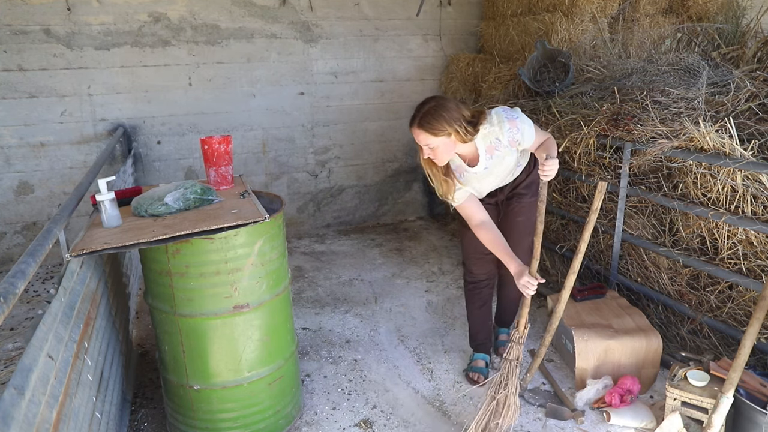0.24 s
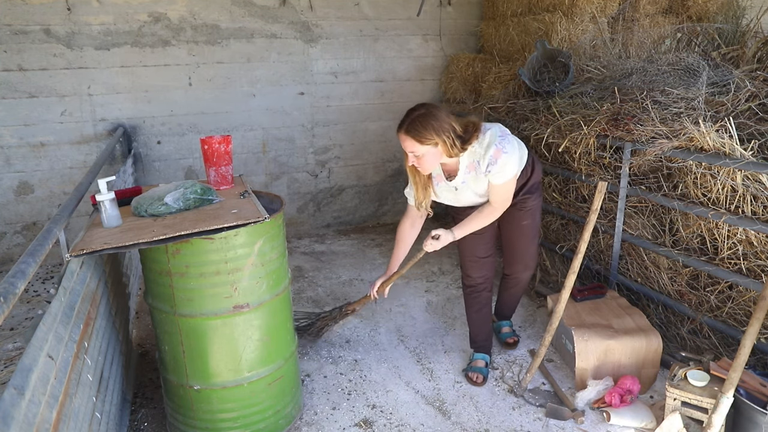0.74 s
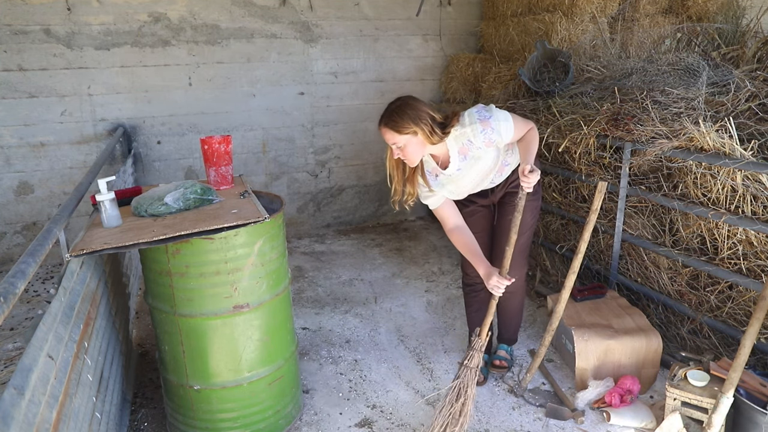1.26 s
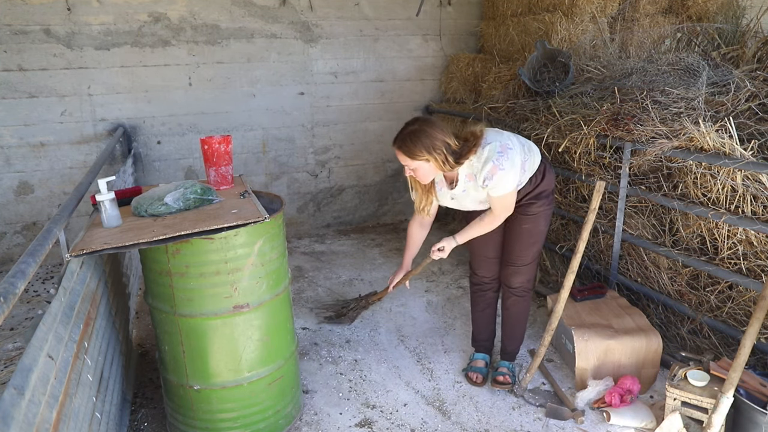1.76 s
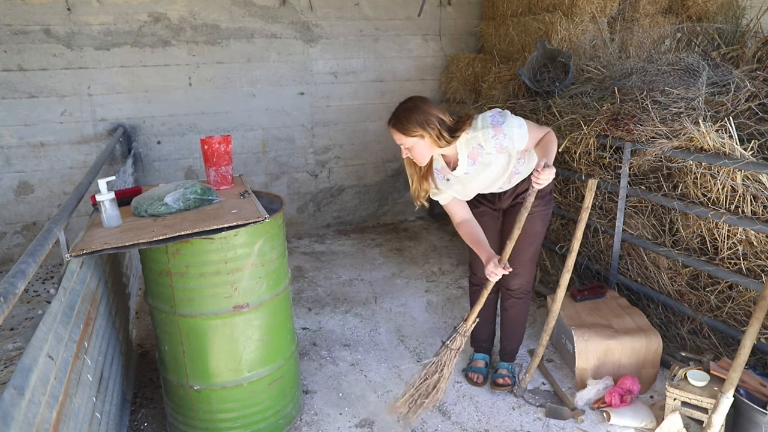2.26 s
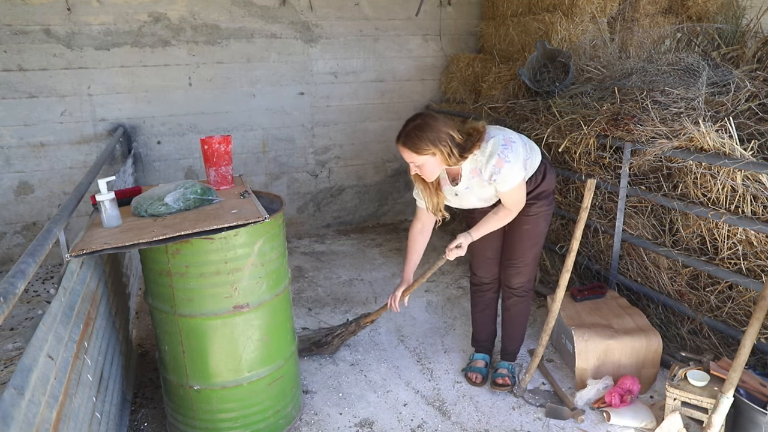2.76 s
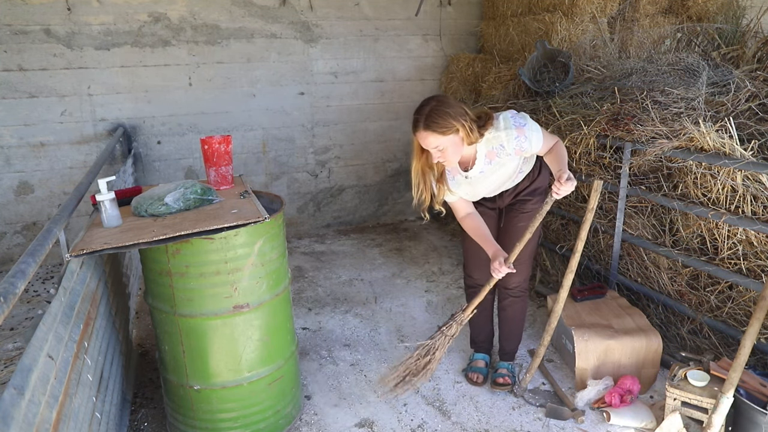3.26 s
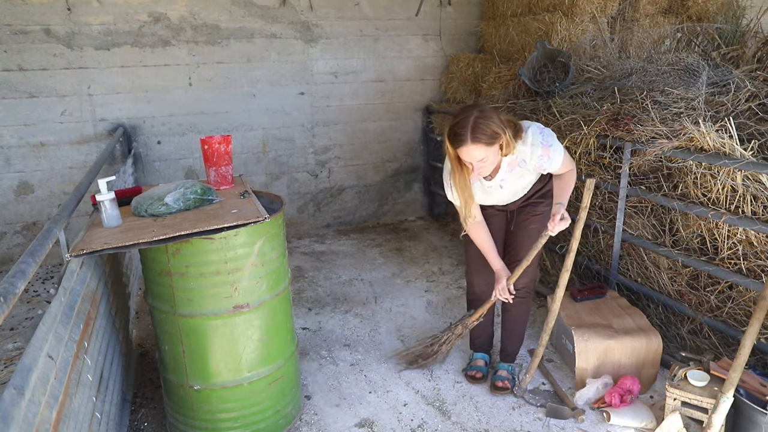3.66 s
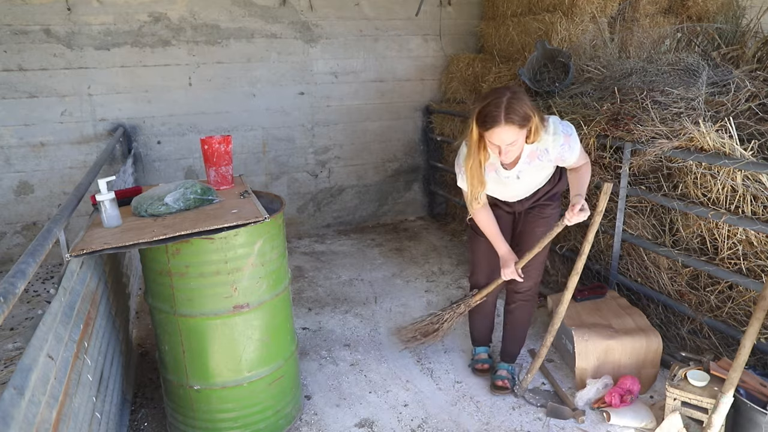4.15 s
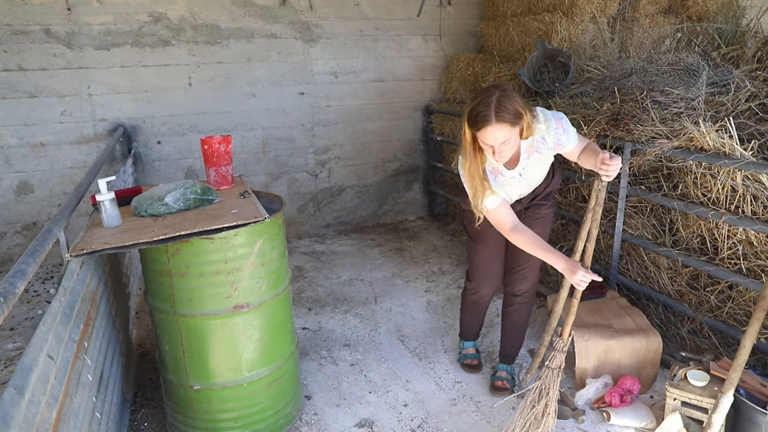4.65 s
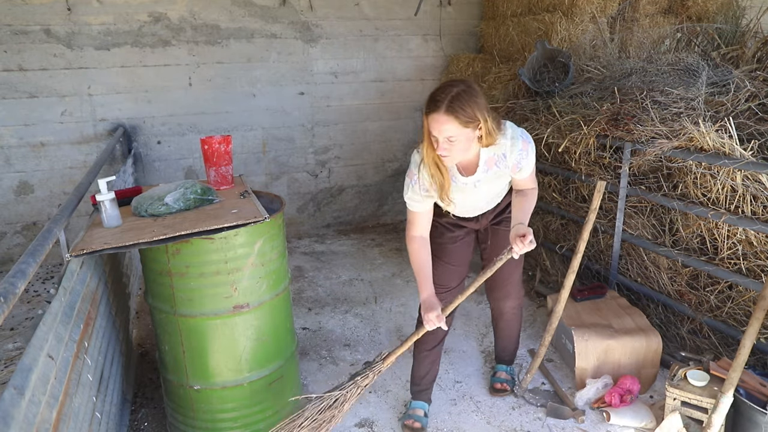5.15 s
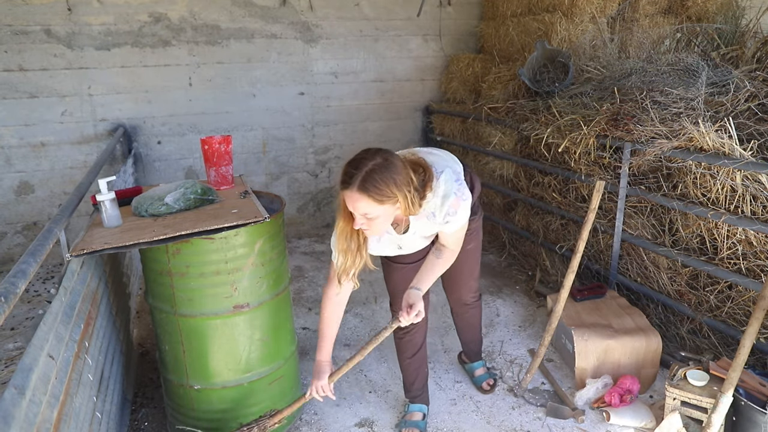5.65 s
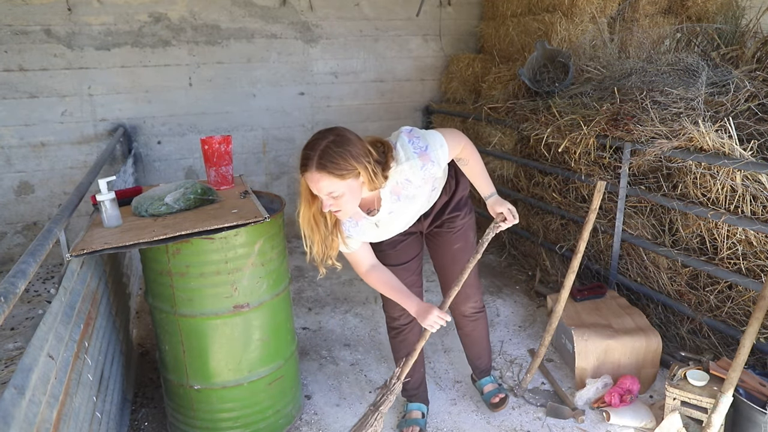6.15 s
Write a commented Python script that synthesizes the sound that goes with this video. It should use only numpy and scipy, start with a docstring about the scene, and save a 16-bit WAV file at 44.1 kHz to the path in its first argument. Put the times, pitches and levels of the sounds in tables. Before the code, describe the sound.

A straw broom works over a concrete floor in a quiet stable, heard by one microphone with short reflections from bare walls. A crisp, hissing stroke fills 0-0.4 s with a tick and tiny squeal; after a gap, double strokes come around 0.9-1.4, 1.9-2.3 and 2.8-3.2 s, each rasp climbing in pitch, with sharp twig snaps, the brightest near 2.9. A sheet-metal partition hums barely audibly around 3. Ticks cluster at 3.6 as another stroke runs to 4.0, then a brisk pair from 4.4 to 4.8 with brief squeaks. Low wind thuds and flutters throughout, dropping away by 4.6. Near 5.25 a sandal knocks and drags. At 5.6-5.7 the twigs strike and rake a steel drum, a loud hollow clatter with short ringing. A last swishing stroke follows around 5.8-6.1, then near-quiet, a faint squeak and a soft footfall at 6.3.

```python
"""A straw broom sweeps a concrete stable floor in brisk strokes: shaped noise and tiny slips, swelling rub by rub.
Its twigs tick in short snaps, squeal briefly, and once knock and rake a steel drum, whose modes ring.
A sheet-metal partition hums when brushed, and sandals knock and drag on the floor as struck modes and noise.
Wind buffets the single microphone in low noise over quiet stable air.
The bare walls, the nearest a metre off, answer briefly with decaying noise."""
import sys
import numpy as np
from scipy import signal
from scipy.fft import rfft, irfft, next_fast_len
from scipy.io import wavfile
from scipy.ndimage import uniform_filter1d, map_coordinates

SR = 44100
rng = np.random.default_rng(int(sys.argv[2]) if len(sys.argv) > 2 else 0)


def log_audio(samples):
    """Write samples as a 16-bit WAV file to the path given in sys.argv[1]."""
    # one column per channel
    frames = np.atleast_2d(samples).T
    # limit to full scale, then quantise
    limited = np.clip(frames, -1, 1)
    pcm = np.round(limited * 32767).astype(np.int16)
    wavfile.write(sys.argv[1], SR, pcm)


def field_ratio(decibels):
    """Amplitude ratio for a level in dB (20 dB per decade); scalars and array-likes work."""
    return 10 ** (np.asarray(decibels, dtype=float) / 20)


N = 282222  # length in samples

STRAY_PER_S, STRAY_DB = 60, -15  # loose straws that crack one at a time: rate, level relative to the hiss
# Fine bristle tips on the concrete. Each row: frequency in Hz, relative density in dB per Hz.
HISS = [(1470, -26), (2500, -8.5), (3240, -24), (3450, -7.5), (5460, 1.5), (6560, -1.5), (8130, 2),
        (9850, -3.5), (14000, -5), (15600, -7)]
# Thick twigs on the concrete. Each row: frequency in Hz, relative density in dB per Hz.
SCRAPE = [(180, -55), (300, -21), (453, -10.5), (498, -14.5), (806, -6.5), (1020, -5), (1470, 0),
          (1600, -0.5), (5000, -5.5), (6500, -51), (11000, -120)]
# Pitch at which the bent twigs rasp; it climbs through most pulls. Each row: time in seconds, pitch in Hz.
RASP = [(0.03, 2660), (.17, 3500), (.39, 3860), (.6, 1800), (.86, 2650), (.97, 2600), (1.17, 3270),
        (1.3, 2950), (1.55, 1800), (2.03, 2320), (2.13, 3180), (2.32, 3700), (2.55, 1800), (2.8, 1950),
        (2.96, 3250), (3.24, 3050), (3.45, 1600), (3.69, 1690), (3.82, 3400), (4.08, 3000), (4.25, 1680),
        (4.42, 2600), (4.51, 3420), (4.72, 3300), (5.0, 1900), (5.67, 1580), (5.9, 2050), (6.07, 3580),
        (6.21, 1450)]


def broom():
    """Fine tips hiss, thick twigs scrape lower; both judder over the rough floor."""
    hiss_gain, scrape_gain = rubbing()
    rasp_hz, = curves(RASP)
    judder_db = 0.68 * wobble(45) + 0.83 * wobble(160)
    tips = coloured(patchy(slips(2500, 3.6, smooth=0.86), depth_db=0.57), HISS)
    twigs = coloured(patchy(slips(1200, 2.1, smooth=0.63), depth_db=1.03), SCRAPE)
    twigs = unit(rasping(twigs, rasp_hz, lift_db=6, octaves=.35))
    strays = coloured(slips(STRAY_PER_S, 2.4, smooth=0), HISS)
    tips = tips + field_ratio(STRAY_DB) * strays
    tip_flicker = field_ratio(0.9 * wobble(45))
    return field_ratio(judder_db) * (hiss_gain * tip_flicker * tips + scrape_gain * twigs)


LIFT_DB_PER_S = 214  # fade as the rubbing lifts off
SAG_DB_PER_S = 13.5  # a rub slackens while it is held
GRIT_DB, GRIT_DB_PER_S = -32.5, 21  # grit rolls on after a rub: level relative to it, fade
# Rubbing on the floor: the broom landing, pulled or lightly brushing, and near 5.2 s a shifting foot.
# Each row: start in seconds, rise in seconds, hold in seconds, hiss level in dB,
# low scrape relative to the hiss in dB.
RUBS = [(0.0, 0.039, .135, -36, -5), (0.15, .104, 0.061, -32.5, -6), (.433, .012, .087, -59.5, -7.5),
        (.85, .035, .084, -44.5, -4.5), (.948, .078, 0.28, -34.5, -3.5), (1.065, 0.096, .14, -36.5, -5.5),
        (1.65, 0.048, .002, -65.5, 4.5), (1.83, 0.047, .104, -57.5, -2.5), (1.881, 0.2, 0.18, -34.5, -4.5),
        (2.085, 0.051, 0.062, -38.5, -10), (2.544, 0.045, .022, -67.5, -3.5), (2.772, .02, .076, -46, -2.5),
        (2.834, .11, .215, -37, -5.5), (3.028, .055, .09, -40, -3.5), (3.55, 0.013, 0.053, -52, -6),
        (3.552, 0.22, 0.013, -39.5, -1.5), (3.729, 0.13, 0.11, -37, -3.5), (4.246, .051, .002, -71.5, 5),
        (4.362, .066, .052, -39.5, -0.5), (4.41, 0.12, 0.076, -34, -4), (4.6, .03, .078, -39.5, -5),
        (5.179, .012, 0.072, -60.5, 0.5), (5.25, .05, .21, -64.5, 4), (5.616, 0.01, .03, -43, 2),
        (5.621, 0.046, 0.033, -38, 3), (5.671, .107, .076, -45.5, 2), (5.765, .074, 0.054, -40.5, -6),
        (5.889, 0.097, 0.094, -36.5, -6), (6.1, .07, .23, -69.5, 12.5)]


def rubbing():
    """Gains of the hiss and the low scrape: the powers of all rubs and their rolling grit add up."""
    hiss, scrape = np.full((2, N), 1e-12)
    for start, rise, hold, db, coarse_db in RUBS:
        rub = swell(start, rise, hold, db, LIFT_DB_PER_S, SAG_DB_PER_S)
        grit = swell(start, rise, hold, db + GRIT_DB, GRIT_DB_PER_S, SAG_DB_PER_S)
        power = rub ** 2 + grit ** 2
        hiss = hiss + power
        scrape = scrape + power * field_ratio(coarse_db) ** 2
    return np.sqrt(hiss), np.sqrt(scrape)


def rasping(x, pitch_hz, lift_db, octaves):
    """A broad resonance that moves as the twigs bend more or less."""
    hz, t, z = signal.stft(x, SR, nperseg=512)
    centre_hz = np.interp(t * SR, np.arange(N), pitch_hz)
    bump = np.exp(-(np.log2((hz[:, None] + 1) / centre_hz) / octaves) ** 2)
    return signal.istft(z * field_ratio(lift_db * bump), SR, nperseg=512)[1][:N]


TICK_OCTAVES, WIDER_PER_OCTAVE = .6, .12  # band of a tick at 8 kHz; lower ticks are wider
# Short ticks of twigs, grit and straps, and from 5.62 s the sharpest low blows on the drum.
# Each row: time in seconds, nominal peak in dB, centre in Hz, time to fall 60 dB in seconds.
TICKS = [(.019, -27, 9300, 0.046), (0.455, -37, 11700, .05), (.526, -45, 11000, .05),
         (.54, -48, 14000, .02), (.726, -51, 7000, 0.027), (.846, -41, 7700, 0.057),
         (0.863, -29.5, 4000, .04), (1.532, -44.5, 11500, 0.1), (1.681, -47, 2400, 0.015),
         (1.690, -46, 1900, .012), (1.701, -41, 10000, 0.044), (1.735, -52, 2300, .012),
         (1.866, -44, 7800, .06), (1.963, -29, 8400, 0.034), (2.520, -47, 11000, .05),
         (2.589, -51, 8000, .08), (2.645, -50, 11000, .03), (2.766, -41, 8100, 0.05),
         (2.789, -28.5, 8020, 0.074), (2.907, -22, 8900, 0.02), (3.515, -50, 6200, .05),
         (3.556, -35.5, 9000, .025), (3.569, -35, 11000, .015), (3.578, -41, 12000, .012),
         (3.594, -29, 9900, .025), (3.608, -31, 11000, .015), (4.355, -48, 12000, .03),
         (4.368, -43, 7000, 0.027), (5.184, -44, 4000, 0.043), (5.236, -33, 2200, 0.018),
         (5.240, -27, 1250, 0.03), (5.315, -39, 1200, 0.016), (5.443, -40, 1700, .04),
         (5.620, -25, 1500, .05), (5.656, -13, 1270, 0.06), (5.716, -20, 1500, .02)]


def ticks():
    """Each tick or blow is a snap of about one cycle with a puff of noise in the same band, dying fast."""
    out, t = np.zeros(N + SR), np.arange(SR // 4) / SR
    hz = np.fft.rfftfreq(len(t), 1 / SR) + 1
    for s, db, centre_hz, t60 in TICKS:
        octaves = max(TICK_OCTAVES + WIDER_PER_OCTAVE * np.log2(8000 / centre_hz), .2)
        band = np.exp(-(np.log2(hz / centre_hz) / octaves) ** 2)
        puff = unit(irfft(rfft(rng.standard_normal(len(t))) * band, len(t)))
        fade = field_ratio(-60 * t / max(t60, .005)) + 1.5 * field_ratio(-60 * t / .008)
        snap = -5 * np.sin(2 * np.pi * centre_hz * t) * np.exp(-1.5 * centre_hz * t)
        tick = field_ratio(db - 16) * (fade * puff + snap)  # the puff's rms lies below its peak
        out[round(s * SR):][:len(t)] += tick
    return out[:N]


# A stiff twig or a strap squeals briefly at its own pitch.
# Each row: middle in seconds, level in dB, pitch in Hz, width in Hz, length to either side in seconds.
SQUEALS = [(0.053, -39.5, 2750, 400, 0.017), (3.171, -35, 2680, 400, 0.012), (4.423, -39, 2520, 500, 0.01),
           (4.476, -39, 2500, 500, 0.0086), (6.23, -52, 1256, 40, 0.021), (6.25, -61, 2380, 200, 0.075)]


def squeals():
    """Rubbing noise caught in one resonance, swelling and fading."""
    out, t, hz = np.zeros(N), np.arange(N) / SR, np.fft.rfftfreq(N, 1 / SR)
    rub = rfft(rng.standard_normal(N))
    for s, db, pitch_hz, width_hz, length in SQUEALS:
        resonance = 1j * hz / (pitch_hz ** 2 - hz ** 2 + 1j * hz * width_hz)
        tone = unit(irfft(rub * resonance, N))
        out += field_ratio(db) * np.exp(-((t - s) / length) ** 2) * tone
    return out


RAKE_BITE_DB = 6  # extra while the twigs hold the wall
# Twigs rubbing the drum wall, before ring and rattle are balanced.
# One row: start in seconds, rise in seconds, hold in seconds, level in dB, fade in dB per second.
RAKE = (5.616, .004, .048, -30.5, 52)
# Modes of the steel drum. Each row: frequency in Hz, relative level in dB, time to fall 60 dB in seconds.
DRUM = [(454, -13, 0.25), (647, -13, 0.53), (847, -3, 0.35), (1134, -13, 0.32), (1303, 1, 0.26),
        (1430, -16, .28), (1665, 0, .17), (1900, -5, 0.32), (2450, -1, 0.26), (2600, -5, 0.091),
        (2800, 1, 0.27)]
# The wall's dense dull rattle. Each row: frequency in Hz, relative density in dB per Hz.
CLATTER = [(50, -22), (100, -12), (250, -10), (400, -5.5), (600, -7), (900, -4.5), (1400, -6.5),
           (1810, -11), (2720, -9.5), (4500, -24), (9000, -79.5)]


def drum():
    """Many twig blows in a row keep the wall's modes ringing and rattling."""
    start, rise, hold, db, fade = RAKE
    biting = np.arange(N) / SR < start + rise + hold
    rake = swell(start, rise, hold, db - RAKE_BITE_DB, fade) * field_ratio(RAKE_BITE_DB * biting)
    ring = struck(rake * slips(900, 2, smooth=.6), DRUM, attack=.0006)
    rattle = rake * coloured(patchy(slips(1200, 1.6, smooth=.7), depth_db=1), CLATTER)
    return field_ratio(-5) * ring + field_ratio(3) * rattle


# Twigs brushing the sheet-metal partition.
# One row: start in seconds, rise in seconds, hold in seconds, relative level in dB, fade in dB per second.
GRAZE = (3, 0.03, 0.05, -57.5, 65)
# Modes of the partition. Each row: frequency in Hz, relative level in dB, time to fall 60 dB in seconds.
PANEL = [(445, -10, .25), (542.5, -0.5, .25), (567.5, 1, 0.23)]


def panel():
    """A light graze makes the sheet hum low and blurred."""
    graze = swell(*GRAZE) * slips(160, 2.7, smooth=.5)
    return field_ratio(2.5) * struck(graze, PANEL, attack=0.0028)


# Sandal soles landing. Each row: time in seconds, relative level in dB.
STEPS = [(5.26, -34), (6.298, -32.5)]
# Hollow under the sole and the drum beside it.
# Each row: frequency in Hz, relative level in dB, time to fall 60 dB in seconds.
SOLE = [(74, -23, 0.85), (154.5, -17, 0.38), (285, 1.5, 0.065), (348, -3, 0.057), (430, 2, 0.09),
        (716, -9, 0.056), (860, -16, .06)]
# Soles dragging on the floor.
# Each row: start in seconds, rise in seconds, hold in seconds, relative level in dB, fade in dB per second.
SHUFFLE = [(.62, .12, .16, -64, 120), (3.95, .02, .01, -57, 36), (5.25, 0.017, .01, -44.5, 300),
           (5.25, .05, .02, -60, 70), (6.3, 0.0092, .003, -45, 500), (6.31, .02, 0.027, -58, 50)]
# Colour of the dragging soles. Each row: frequency in Hz, relative density in dB per Hz.
DRAG = [(150, -33), (300, -4.5), (430, -4), (700, -7), (1500, -13.5), (3000, -41)]


def steps():
    """The sole rolls down on its pocket of air in a few quick knocks; soles also drag on the floor."""
    out, t = np.zeros(N + SR), np.arange(SR // 20) / SR
    for s, db in STEPS:
        knocks = rng.standard_normal(len(t)) * (rng.random(len(t)) < .004)
        roll = 0.26 * field_ratio(-60 * t / 0.11) * knocks
        roll[0] = 1  # the landing itself
        step = signal.fftconvolve(roll, ringing(SOLE, attack=0.0024))[:SR // 2]
        out[round(s * SR):][:SR // 2] += field_ratio(db - 4) * step
    drag_gain = sum(swell(*row) for row in SHUFFLE)
    drag = coloured(patchy(rng.standard_normal(N), depth_db=1.5), DRAG)
    return out[:N] + field_ratio(-2.5) * drag_gain * drag


# The bare walls' answer. Each row: frequency in Hz, time to fall 60 dB in seconds.
WALLS = [(200, 1), (1000, 0.3), (4000, 0.38), (12000, 0.31)]


def walls(x):
    """Each frequency of the answer dies at its own speed; a new answer every 0.2 s as the broom moves about."""
    out, size = np.zeros(N + SR), SR // 5
    for start in range(0, N, size):
        hz, t, z = signal.stft(rng.standard_normal(SR // 2), SR, nperseg=256)
        fade = field_ratio(-60 * t / along(WALLS, hz)[:, None])
        tail = signal.istft(z * fade, SR, nperseg=256)[1]
        answer = signal.fftconvolve(x[start:start + size], tail / np.linalg.norm(tail))
        out[start + 300:][:len(answer)] += answer  # delay in samples: the nearest wall is a metre off
    return out[:N]


FLUTTER_DB = -12  # steady share of sharper flutter, relative to the buffet
# Strength of the wind at the microphone. Each row: time in seconds, buffet level in dB.
WIND = [(0.0, -43), (0.13, -48.5), (0.19, -29.5), (0.23, -37), (0.69, -57.5), (0.74, -46.5), (1.24, -39),
        (1.38, -45), (1.47, -31), (1.51, -44.5), (1.68, -37.5), (2.02, -61), (2.1, -50.5), (2.68, -38),
        (2.87, -55), (3.05, -52), (3.14, -40), (3.59, -54.5), (3.74, -43), (3.91, -57), (4.09, -53.5),
        (4.6, -85)]
# Low thud of the wind. Each row: frequency in Hz, relative density in dB per Hz.
BUFFET = [(7.1, -31), (12, -2), (43, -2), (57, -6.5), (76, -10.5), (120, -22), (160, -51), (260, -120)]
# Sharper flutter of the wind. Each row: frequency in Hz, relative density in dB per Hz.
FLUTTER = [(29, 7.5), (50, -10.5), (91, 3), (210, -9.5), (440, -34), (481, -40), (700, -41), (910, -69),
           (1540, -120)]
# Small fast eddies on the port.
# Each row: middle in seconds, flutter level in dB, length to either side in seconds.
PUFFS = [(.19, -39.5, 0.026), (0.293, -49, .03), (.77, -53, .03), (.86, -48, 0.027), (1.098, -47, 0.076),
         (1.272, -47, 0.033), (1.434, -47, 0.037), (1.57, -44.5, .05), (1.7, -47, .04), (2.183, -56, .04),
         (2.444, -43.5, 0.083), (2.637, -39, 0.081), (3.3, -53.5, 0.11), (3.717, -39.5, 0.037),
         (4.1, -64, .05), (5.75, -66, .12), (6.33, -63, .06)]


def wind():
    """Eddies on the microphone port, with a faster flutter on top; the wind drops late."""
    buffet_db, = curves(WIND)
    t = np.arange(N) / SR
    puffs = sum(field_ratio(db) * np.exp(-((t - s) / length) ** 2) for s, db, length in PUFFS)
    lumps = field_ratio(2.5 * wobble(12))
    buffet = unit(lumps * coloured(rng.standard_normal(N), BUFFET))
    flutter = unit(lumps * field_ratio(1.2 * wobble(30)) * coloured(rng.standard_normal(N), FLUTTER))
    flutter_gain = field_ratio(buffet_db + FLUTTER_DB) + puffs
    return field_ratio(buffet_db) * buffet + flutter_gain * flutter


AIR_DB = -64.5
# Still stable air. Each row: frequency in Hz, relative density in dB per Hz.
AIR = [(12, -49.5), (20, -16), (95, -3), (453, 0), (814, -3.5), (885, -5.5), (1050, -4.5), (1460, -8.5),
       (2280, -13), (3870, -14), (5120, -13), (8690, -18.5), (15600, -27)]


def air():
    """Quiet, smooth background of the stable, as noise whose level drifts a little."""
    return field_ratio(AIR_DB + 1.33 * wobble(3.65)) * coloured(rng.standard_normal(N), AIR)


def unit(x):
    """Scaled to rms 1."""
    return x / np.sqrt(np.mean(x ** 2) + 1e-20)


def along(points, hz):
    """(Hz, value) points read on a log frequency axis."""
    f, v = np.transpose(points)
    return np.interp(np.log(hz + 1), np.log(f + 1), v)


def curves(rows):
    """One value per sample for each column after the time."""
    s, *cols = np.transpose(rows)
    return [np.interp(np.arange(N) / SR, s, c) for c in cols]


def wobble(rate):
    """A smooth random curve, rate knots a second."""
    knots = rng.standard_normal(int(N * rate / SR) + 4)
    return map_coordinates(knots, [np.arange(N) * rate / SR])


def coloured(x, spectrum):
    """x through a (Hz, dB) spectrum, rms 1."""
    m = next_fast_len(N + 8192)
    gain = field_ratio(along(spectrum, np.fft.rfftfreq(m, 1 / SR)))
    return unit(irfft(rfft(x, m) * gain, m)[:N])


def slips(per_s, spread_db, smooth):
    """Tiny stick-slip impulses of uneven size on a smooth bed of rubbing."""
    when, size, sign = rng.random((3, N))
    heights = field_ratio(-spread_db * np.log(size + 0.0044))
    snaps = (when < per_s / SR) * heights * np.sign(sign - .5)
    share = np.clip(smooth, 0, 1)  # the bed's part of the power
    return np.sqrt(1 - share) * unit(snaps) + np.sqrt(share) * rng.standard_normal(N)


def patchy(x, depth_db):
    """Patches of the rubbing, such as bunches of twigs, catch and let go, each in its own band."""
    z = signal.stft(x, nperseg=256)[2]
    field = uniform_filter1d(rng.standard_normal(z.shape), size=7, axis=0)
    field = uniform_filter1d(field, size=6, axis=1)
    return signal.istft(z * field_ratio(depth_db * unit(field)), nperseg=256)[1][:N]


RISE_DB = 30.5  # depth of a swell


def swell(start, rise, hold, db, fade_db_per_s, sag_db_per_s=0):
    """A gain that swells with a round shoulder, holds or sags, and fades evenly in dB."""
    t = np.arange(N) / SR - start
    short = 1 - np.clip(t / max(rise, .002), 0, 1)  # part of the rise still to come
    held_db = db - RISE_DB * short ** 2 - sag_db_per_s * np.clip(t - rise, 0, hold)
    return (t >= 0) * field_ratio(held_db - fade_db_per_s * np.maximum(t - rise - hold, 0))


def ringing(modes, attack):
    """One blow on a set of decaying modes, each at a new strength."""
    t = np.arange(SR // 2) / SR
    tones = 0
    for hz, db, t60 in modes:
        strength_db = db + rng.normal(0, 0.93)
        tones = tones + field_ratio(strength_db - 60 * t / t60) * np.sin(2 * np.pi * hz * t)
    return tones * (1 - np.exp(-t / attack))


def struck(blows, modes, attack):
    """A row of blows through the ring of one object."""
    ring = ringing(modes, attack)
    return signal.fftconvolve(blows, ring / np.linalg.norm(ring))[:N]


def scene():
    """One microphone feeds both channels."""
    near = broom() + ticks() + squeals() + drum() + panel() + steps()
    mono = near + field_ratio(-11) * walls(near) + wind() + air()
    return np.array([mono, mono])


def band_limit(x):
    """A steep low-pass at the top of the band."""
    return signal.sosfilt(signal.butter(12, 16500, fs=SR, output="sos"), x)


TOP_HZ = 15900


def record(dry):
    """The treble falls steeply between 15.7 and 15.9 kHz, below the band limit."""
    edge = np.clip((TOP_HZ - np.fft.rfftfreq(N, 1 / SR)) / 200, 0, 1)
    mix = irfft(rfft(dry) * np.sin(edge * np.pi / 2) ** 2, N)
    return band_limit(mix)


dry = scene()
out = record(dry)
log_audio(out)
```